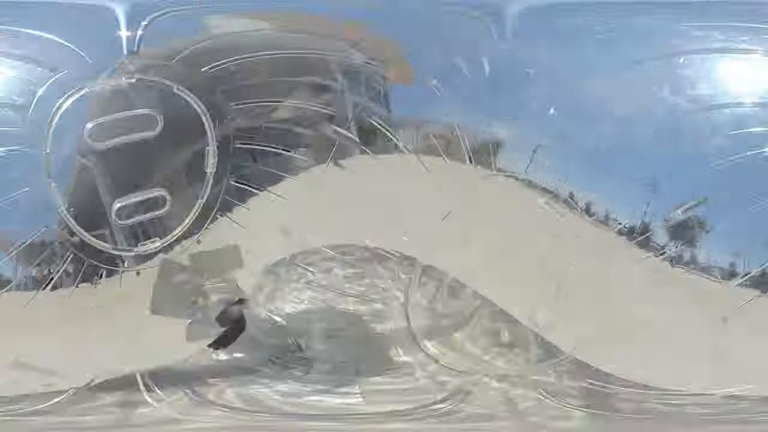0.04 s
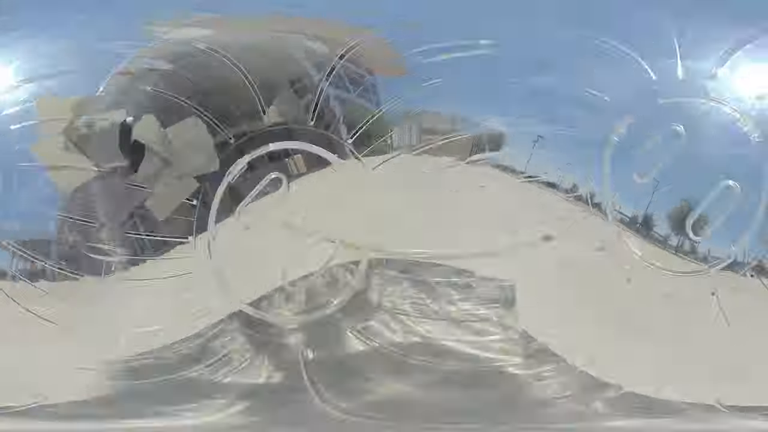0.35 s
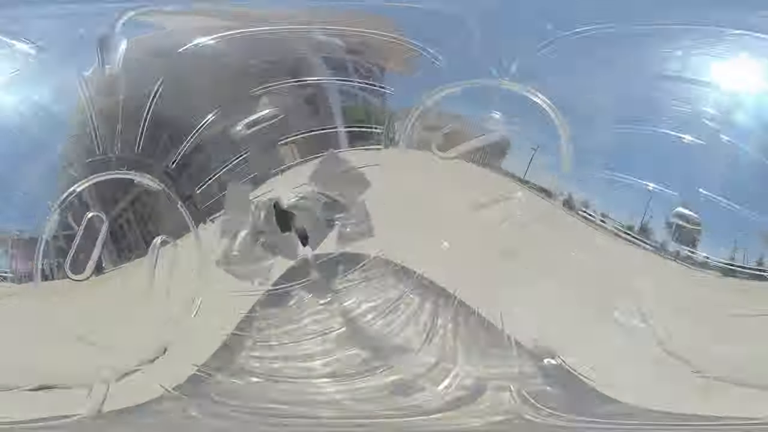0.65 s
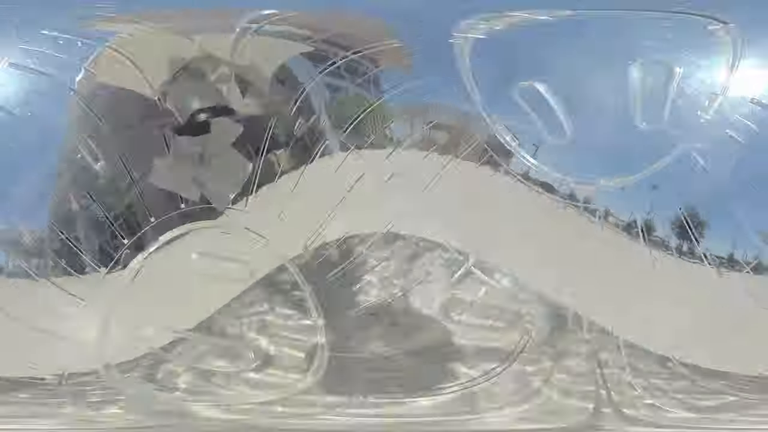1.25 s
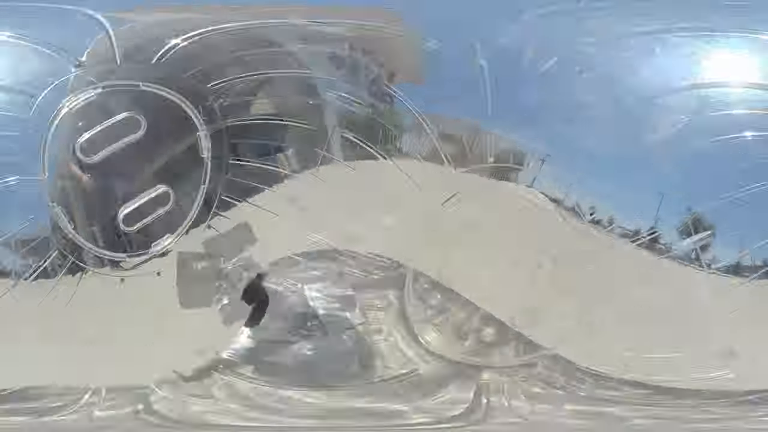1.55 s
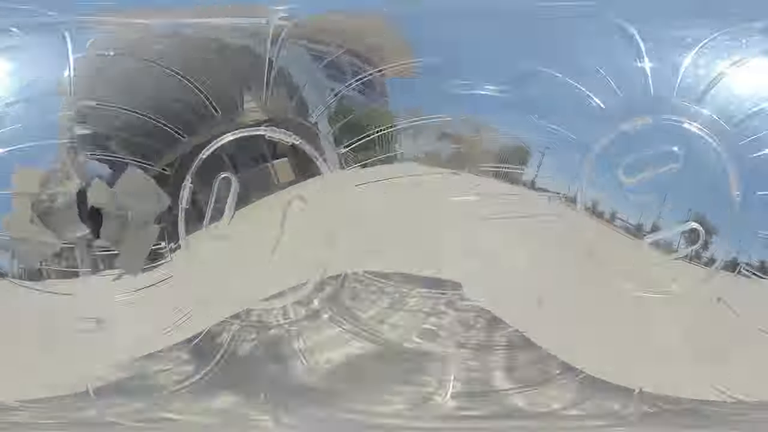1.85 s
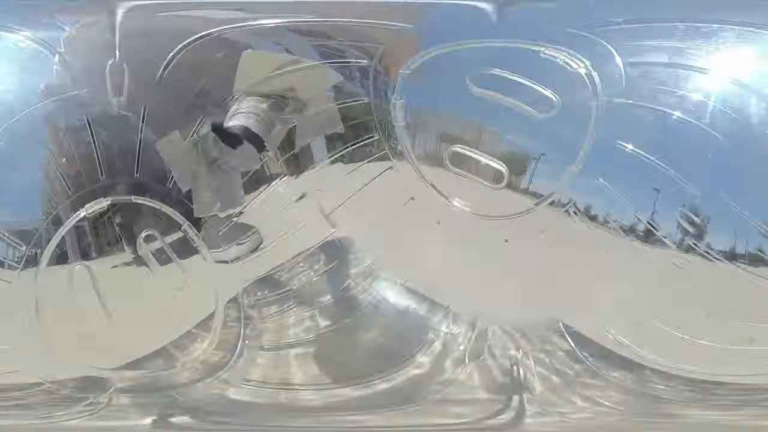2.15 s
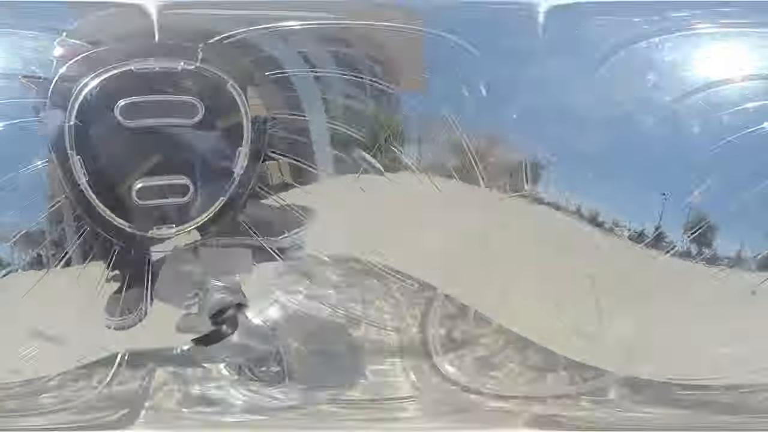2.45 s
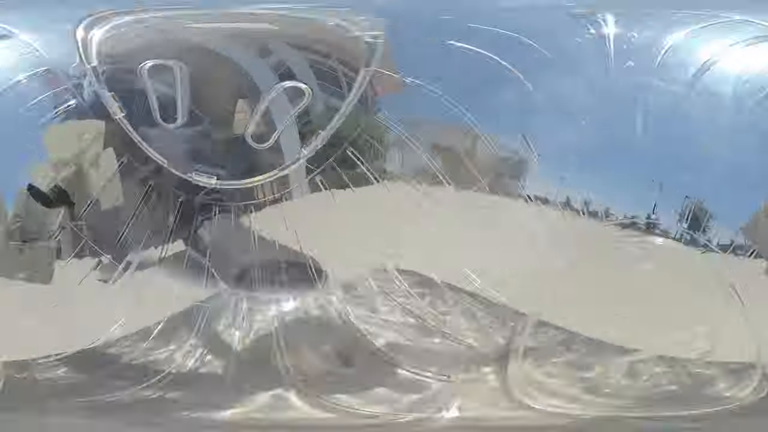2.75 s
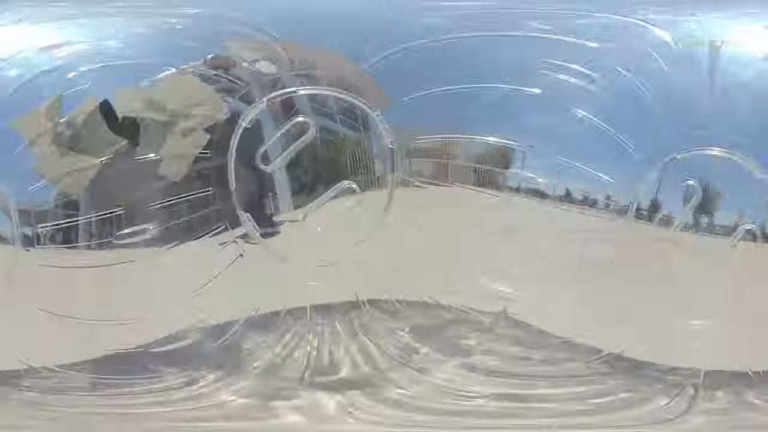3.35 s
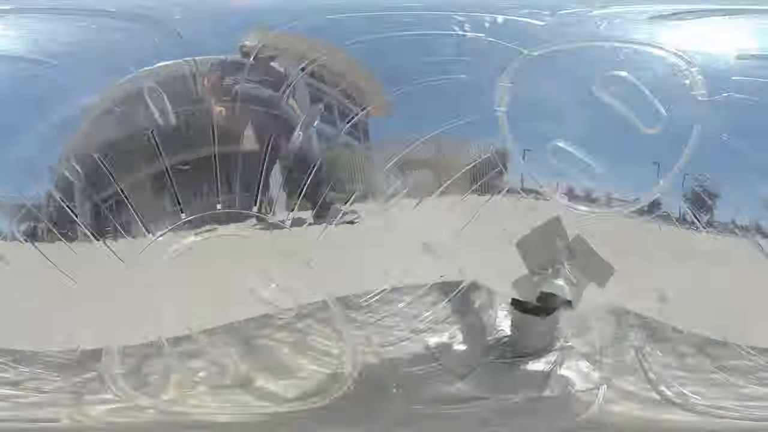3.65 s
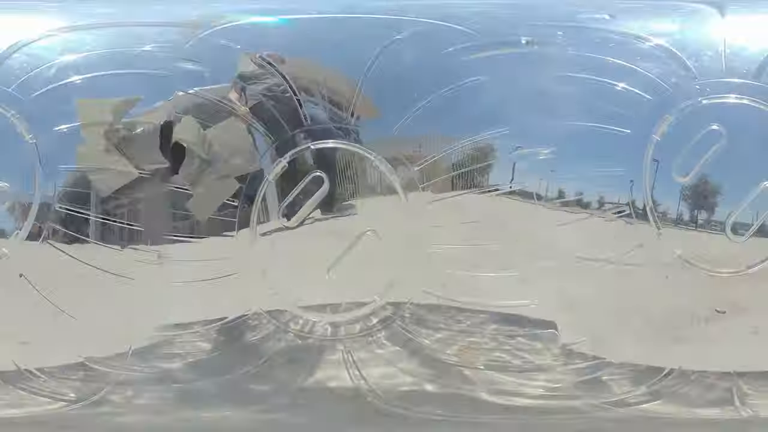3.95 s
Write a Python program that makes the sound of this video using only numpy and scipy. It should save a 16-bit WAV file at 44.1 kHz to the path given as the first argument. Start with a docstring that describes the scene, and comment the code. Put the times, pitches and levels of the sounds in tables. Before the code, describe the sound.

Hollow rumble inside a hard plastic ball rolling over pavement, with irregular clacks and bumps.

```python
"""Inside a rolling plastic ball

A hollow ball rolls over rough pavement, heard from within. The grain of the ground keeps it
booming near 450 Hz and its shell ringing faintly. Stones tap the wall, bumps swell the boom,
shell and mount clack, and a few hard jolts leave single modes of the shell singing."""
import sys
import numpy as np
from scipy import signal
from scipy.fft import rfft, irfft
from scipy.io import wavfile

SR = 44100
rng = np.random.default_rng(int(sys.argv[2]) if len(sys.argv) > 2 else 0)


def waveform_to_disk(signal):
    """Save audio, clipped to [-1, 1], as 16-bit WAV at the path in sys.argv[1]."""
    frames = np.transpose(np.atleast_2d(signal))
    scaled = np.clip(frames, -1, 1) * 32767
    samples = np.round(scaled).astype(np.int16)
    wavfile.write(sys.argv[1], SR, samples)


N = 176400
T = np.arange(N) / SR


# Each row: time in seconds, then relative levels of rumble, boom, grit and pebbles in dB.
ROLL_LEVELS = [(0, -45.5, -31, -39.5, -47.5), (.75, -38, -32.5, -42.5, -49), (1.4, -45, -33.5, -44, -45.5),
               (2.45, -43, -33.5, -44, -55), (2.7, -38.5, -33, -38.5, -49), (2.95, -43, -32, -45.5, -48.5),
               (3.4, -41.5, -33.5, -45, -52), (3.58, -36.5, -29.5, -46, -43), (4, -42, -33, -43, -56.5)]
# Spectra of the rolling. Each row: frequency in Hz, relative level in dB.
RUMBLE_SPECTRUM = [(18, -14), (30, -5), (50, -4.5), (100, 3.5), (210, -8.5), (300, 3.5), (600, -21),
                   (1500, -88)]
BOOM_SPECTRUM = [(100, -26.5), (250, -13), (340, -3), (400, -7.5), (432, 0.5), (470, 1), (540, -1.5),
                 (620, -9), (800, -16.5), (4000, -72.5)]
GRIT_SPECTRUM = [(200, -10.5), (700, 9), (1600, -2), (2200, -12.5), (3000, -12), (6000, -12), (8000, -22),
                 (11500, -23.5), (16000, -40)]
# A low hum that comes and goes as the ball turns. Each row: time in seconds, level in dB.
HUM_LEVELS = [(0, -66), (.7, -45.5), (1.0, -65.5), (3.25, -49), (3.45, -47), (4, -41.5)]

def rolling(half_turn_s=.375, lump_s=.0053, hum_hz=159.5, hum_width_hz=9.8):
    """Forced vibration: contact drives rumble, boom and shell; one resonance sways each half turn."""
    times, rumble_db, boom_db, grit_db, _ = np.transpose(ROLL_LEVELS)
    lumps = unit(signal.fftconvolve(rng.standard_normal(N), np.hanning(int(2 * lump_s * SR)), "same"))
    force = contact_force()
    rough = force * amp(2.5 * lumps)
    steady = (force + .67 * rng.standard_normal((2, N))) * amp(2.35 * lumps)
    body = unit(colour(steady, BOOM_SPECTRUM))
    sway_hz = 500.5 + 28.7 * np.cos(2 * np.pi * (T - .03) / half_turn_s)
    sway = resonate(body, sway_hz, width_hz=31)
    boom = (amp(1) * body + amp(-12) * sway) * amp(np.interp(T, times, boom_db))
    rumble = unit(colour(rough, RUMBLE_SPECTRUM)) * amp(np.interp(T, times, rumble_db) - 1)
    grit = unit(shell(rough, GRIT_SPECTRUM)) * amp(np.interp(T, times, grit_db))
    hum = resonate(resonate(steady, hum_hz, hum_width_hz), hum_hz, 2 * hum_width_hz)
    hum *= amp(np.interp(T, *np.transpose(HUM_LEVELS)))
    return spread(rumble + boom + grit + hum)


def contact_force(grains_per_s=300, spread_db=4.5, smear_s=.0032, scrape=.24):
    """Shot noise: grains of pavement, scattered round the shell, add their power to a steady scrape."""
    sizes = amp(spread_db * np.minimum(rng.exponential(1, N), 3.4))
    grains = sizes * (rng.random(N) < grains_per_s / SR)
    power = signal.lfilter([1], [1, -np.exp(-1 / (smear_s * SR))], grains ** 2)
    return unit(np.sqrt(power / power.mean() + scrape ** 2) * rng.standard_normal((2, N)))


# Modes of the shell. Each row: frequency in Hz, bandwidth in Hz, height in dB.
SHELL_MODES = [(1041, 52, 8.5), (1564, 39, 4.5), (2208, 87, 15.5), (2632, 46, 21), (3200, 19.6, 17.5),
               (3827, 30.6, 17.5), (3980, 35, 14.5), (4233, 39, 12), (4655, 64, 10.5), (5240, 31, 12.5),
               (6020, 14, 6)]

def shell(x, spectrum=((1, 0),)):
    """Modal response: the shell rings at its natural frequencies over a spectrum, flat by default."""
    return colour(x, spectrum, SHELL_MODES)


# Bumps, then wider dips. Each row: time in seconds, relative level in dB, nominal pitch in Hz.
BUMPS = [(0.412, -15, 481), (0.472, -15, 460), (0.513, -11, 580), (0.981, -21, 550), (1.13, -15, 512),
         (1.241, -15.5, 492), (1.536, -15.5, 500), (1.569, -13, 438), (1.961, -13, 433), (2.024, -16, 487),
         (2.075, -16, 460), (2.097, -15.5, 393), (2.327, -16.5, 505), (2.416, -14.5, 431),
         (2.589, -11.5, 425), (2.648, -16, 423), (2.783, -2.5, 443), (2.875, -13.5, 444), (2.883, -7, 440),
         (3.045, -14.5, 460), (3.172, -11.5, 521), (3.27, -16, 487), (3.461, -15, 386), (3.573, -14, 400),
         (3.798, -16, 450)]
DIPS = [(0.222, -31, 103), (1.006, -30.5, 103), (1.647, -34.5, 60.4), (1.812, -31, 92), (2.232, -36, 105),
        (2.572, -27, 118), (2.63, -26.5, 104), (3.105, -28.5, 62.6)]

def bumps():
    """Transient response: bumps knock and swell the boom, heavy ones for longer; dips thud low."""
    out = np.zeros(N)
    for start, db, hz in BUMPS:
        rise_s = .0068 * amp(.2 * db)
        add(out, start, amp(-25.5) * push(contact_s=.00053))
        add(out, start - rise_s / 2, swell(db - 4.5, hz, rise_s))
    for start, db, hz in DIPS:
        add(out, start, swell(db, hz, rise_s=.014))
    return out


# Each row: start in seconds, relative middle, treble and top levels in dB, decay constant in seconds.
CLACKS = [(.060, -33, -33.5, -40.5, 0.0046), (0.128, -61, -43, -46.5, 0.0055),
          (0.233, -32.5, -36, -46.5, 0.0059), (.332, -36, -29.5, -36.5, 0.0069),
          (.355, -42, -40.5, -51, 0.012), (.413, -34.5, -38, -50, 0.014),
          (.510, -16.5, -31.5, -43.5, 0.0058), (.618, -27.5, -40, -51, 0.0081),
          (.727, -30, -42, -51.5, 0.012), (0.801, -40, -33, -37.5, 0.011), (0.917, -37, -38.5, -46, 0.0052),
          (.977, -30, -49, -57, 0.0071), (1.085, -30.5, -42.5, -52, 0.0092),
          (1.131, -34.5, -46, -48.5, 0.0091), (1.201, -36, -42.5, -54, 0.014),
          (1.241, -33.5, -43.5, -52.5, 0.013), (1.329, -35, -36.5, -46.5, 0.0054),
          (1.453, -32.5, -40, -47, 0.0091), (1.467, -26, -24, -32, 0.0047), (1.535, -31, -34, -41, 0.0053),
          (1.599, -35, -32.5, -48, 0.0045), (1.671, -33.5, -40.5, -49, 0.0083),
          (1.875, -36, -38.5, -47.5, 0.01), (1.958, -25, -25, -36.5, 0.0055),
          (2.016, -31.5, -33, -40.5, 0.011), (2.071, -29.5, -36, -50, 0.0088),
          (2.324, -33.5, -37, -45.5, 0.012), (2.41, -38, -40, -53, 0.0096),
          (2.449, -36.5, -39, -45.5, 0.0089), (2.574, -20, -33.5, -41, 0.0091),
          (2.59, -52, -22, -30, 0.0048), (2.633, -23.5, -27, -34, 0.0075), (2.73, -27.5, -30, -39.5, 0.013),
          (2.770, -33, -29, -46, 0.012), (2.779, -16.5, -36, -32, 0.0071),
          (2.846, -24.5, -30.5, -39.5, 0.011), (2.868, -25, -39.5, -45.5, 0.013),
          (2.976, -34, -51.5, -60, 0.019), (3.112, -28, -35, -48, 0.0068),
          (3.170, -29.5, -36.5, -43.5, 0.0085), (3.268, -32.5, -38.5, -46.5, 0.005),
          (3.378, -33.5, -36, -42, 0.0045), (3.462, -30.5, -36.5, -48, 0.0067),
          (3.492, -35, -43, -50, 0.011), (3.612, -40, -41.5, -56.5, 0.015),
          (3.764, -34.5, -37, -45, 0.0066), (3.795, -39, -39.5, -49, 0.0062), (3.889, -42, -43, -52, 0.014)]
# Spectrum shared by all clacks. Each row: frequency in Hz, gain in dB.
CLACK_SPECTRUM = [(100, -7), (400, 21), (800, 10.5), (2200, 2.5), (3100, -1), (6000, 10.5), (8000, 3.5),
                  (11000, 6), (16000, -8.5)]

def clacks(bands_hz=(1500, 4200, 10000), rise_s=.0013, tail_s=.05):
    """Impact noise: plastic strikes plastic, and a burst of dense reflections rings the shell."""
    out, t = np.zeros((2, N)), T[:SR // 7]
    hz = np.fft.rfftfreq(len(t), 1 / SR)
    for start, *bands_db, decay_s in CLACKS:
        tone = amp(level_at(list(zip(bands_hz, bands_db)), hz))
        burst = irfft(rfft(rng.standard_normal((2, len(t)))) * tone, len(t))
        fall = np.exp(-t / decay_s) + amp(-31) * np.exp(-t / tail_s)
        add(out, start, burst * (1 - np.exp(-t / rise_s)) * fall)
    return spread(shell(out, CLACK_SPECTRUM))


# Each row: start in seconds, relative level in dB, contact time in seconds, wall pitch in Hz.
JOLTS = [(0.513, -23.5, 0.00069, 1180), (0.517, -22, 0.00045, 1634), (1.958, -21.5, 0.00025, 1495),
         (2.573, -20, 0.00043, 710), (2.580, -18, 0.00067, 660), (2.777, -17, 0.00016, 1276),
         (2.782, -21, 0.00017, 1103)]

def jolts(decay_s=.0053):
    """Impulse excitation: a hard landing pushes the wall, which rings and wakes the shell's modes."""
    out, t = np.zeros(N), T[:SR // 16]
    for start, db, contact_s, hz in JOLTS:
        ring = amp(-2.5) * np.exp(-t / decay_s) * np.sin(2 * np.pi * hz * t)
        add(out, start, amp(db) * (push(contact_s) - ring))
    return shell(out[None])


# Blows that single out a mode. Each row: start in seconds, relative level in dB, pitch in Hz.
PINGS = [(.513, -19, 2650), (1.958, -13.5, 1058), (1.960, -17.5, 2640), (1.959, -31, 3800),
         (1.959, -22, 4200), (2.590, -21, 4600), (2.633, -13.5, 2182), (2.771, -20.5, 4260),
         (2.780, -21, 2210)]

def pings(rise_s=.0026):
    """Free vibration: one struck shell mode sings on, decaying at a rate set by its bandwidth."""
    out, t = np.zeros(N), T[:SR // 7]
    mode_hz, width_hz, _ = np.transpose(SHELL_MODES)
    for start, db, hz in PINGS:
        nearest = np.argmin(abs(mode_hz - hz))
        envelope = (1 - np.exp(-t / rise_s)) * np.exp(-np.pi * width_hz[nearest] * t)
        add(out, start, amp(db) * envelope * np.sin(2 * np.pi * hz * t))
    return out


def pebbles(per_s=130, low_hz=1090, high_hz=1970, bounce_s=.0064):
    """Random impacts: each stone taps and rebounds once, with a short note that the shell takes up."""
    out = np.zeros((2, N))
    times, *_, pebble_db = np.transpose(ROLL_LEVELS)
    for when, pitch, size, place, gap in rng.random((int(per_s * N / SR), 5)):
        start = when * N / SR
        hz = low_hz * (high_hz / low_hz) ** pitch
        db = np.interp(start, times, pebble_db) + 11 * size ** 2
        tap = np.outer([1, 2 * np.cos(np.pi * place)], swell(db, hz, rise_s=.00099))  # mid and side
        add(out, start, tap)
        add(out, start + bounce_s * (.5 + gap), .5 * tap)
    return amp(-3.5) * spread(shell(out))


def tick(start=.8521, decay_s=.00005):
    """A brief pulse has a broad spectrum: one dry, sharp tick right at the microphone."""
    out = np.zeros(N)
    add(out, start, -amp(-11) * np.exp(-T[:SR // 200] / decay_s))
    return out


def swell(db, hz, rise_s, sag=.11):
    """Damped oscillation: a few cycles swell and die, sagging in pitch as the ball unloads."""
    age = T[:SR // 7] / rise_s
    cycles = np.cumsum(hz * (1 + sag * (np.exp(-age / 2) - .5))) / SR
    return amp(db) * (age * np.exp(1 - age)) ** 2 * np.sin(2 * np.pi * cycles)


def push(contact_s):
    """Elastic recoil: the wall is pushed in and springs out once."""
    age = T[:SR // 16] / contact_s
    return age * (age - 2) * np.exp(1 - age)


def resonate(x, hz, width_hz):
    """Resonance: a narrow band follows the pitch hz, scaled to rms 1."""
    carrier = np.exp(2j * np.pi * np.cumsum(hz * np.ones(N)) / SR)
    pole = np.exp(-np.pi * width_hz / SR)
    return unit((carrier * signal.lfilter([1 - pole], [1, -pole], x / carrier)).real)


def colour(x, spectrum, modes=(), size=8192):
    """Minimum-phase filtering: resonance peaks stand on a broad spectrum and ring causally."""
    hz = abs(np.fft.fftfreq(size, 1 / SR))
    power = 1 + sum(amp(db) ** 2 / (1 + (2 * (hz - f) / width) ** 2) for f, width, db in modes)
    log_gain = np.log(amp(level_at(spectrum, hz)) * np.sqrt(power))
    taps = np.fft.ifft(np.exp(np.conj(signal.hilbert(log_gain)))).real[:size // 2]
    return signal.oaconvolve(x, taps[None], axes=1)[:, :N]


# Stereo width. Each row: frequency in Hz, gain of the side signal in dB.
SIDE_GAIN = [(30, 1), (160, -7), (300, -16), (480, -35), (700, -9.5), (1200, -5), (5000, -2.5),
             (12000, -3.5)]

def spread(pair):
    """Mid-side stereo: sum and difference give left and right."""
    side = irfft(rfft(pair[1]) * amp(level_at(SIDE_GAIN, np.fft.rfftfreq(N, 1 / SR))), N)
    return np.array([pair[0] + side, pair[0] - side])


def amp(db):
    """Decibels to gain."""
    return 10 ** (np.asarray(db) / 20)


def unit(x):
    """Normalisation to rms 1."""
    return x / np.sqrt(np.mean(x ** 2) + 1e-20)


def level_at(spectrum, hz):
    """Interpolation on a log-frequency axis."""
    knots_hz, db = np.transpose(spectrum)
    return np.interp(np.log(hz + 1), np.log(knots_hz), db)


def add(mix, start, sound):
    """Superposition of a sound from its start in seconds."""
    part = mix[..., round(start * SR):][..., :sound.shape[-1]]
    part += sound[..., :part.shape[-1]]


def scene():
    """Superposition: all the sources sum inside the ball."""
    return rolling() + pebbles() + clacks() + bumps() + jolts() + pings() + tick()


# Each row: frequency in Hz, level of left over right in dB.
LEFT_LEAN = [(500, .9), (1100, 2.2), (2600, 2.4), (4500, .5)]

def record(dry, cutoff_hz=16100):
    """Level difference and band limit: the microphones lean slightly left and lose the highest treble."""
    lean_db = level_at(LEFT_LEAN, np.fft.rfftfreq(N, 1 / SR)) / 2
    leaning = irfft(rfft(dry) * amp([lean_db, -lean_db]), N)
    low_pass = signal.firwin(255, cutoff_hz, window=("kaiser", 9), fs=SR)
    return signal.oaconvolve(leaning, low_pass[None], "same")


dry = scene()
out = record(dry)
waveform_to_disk(out)
```